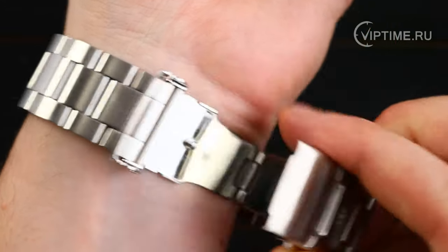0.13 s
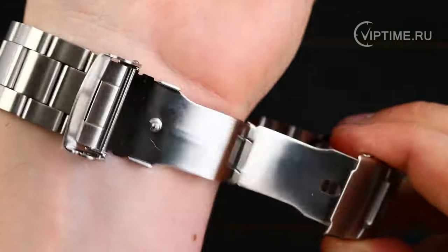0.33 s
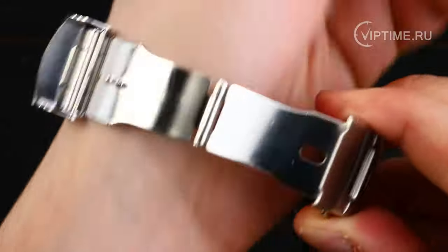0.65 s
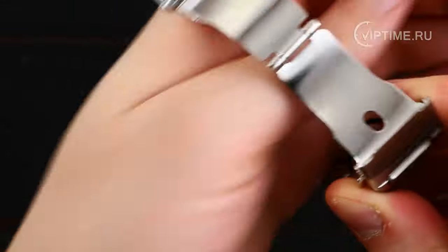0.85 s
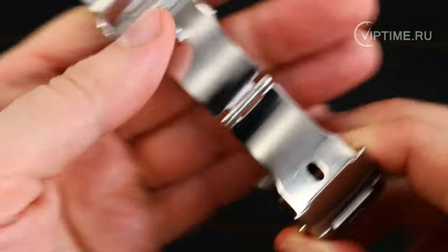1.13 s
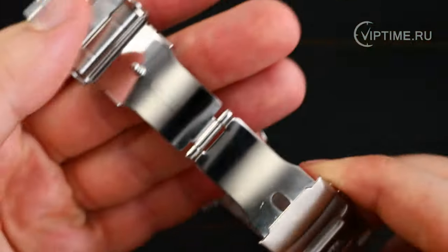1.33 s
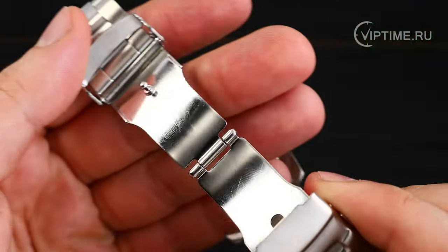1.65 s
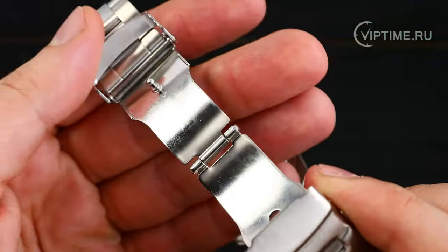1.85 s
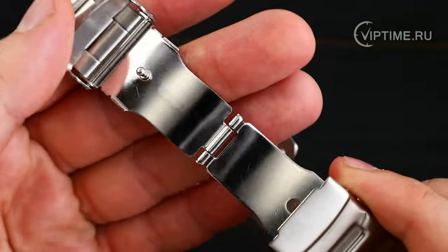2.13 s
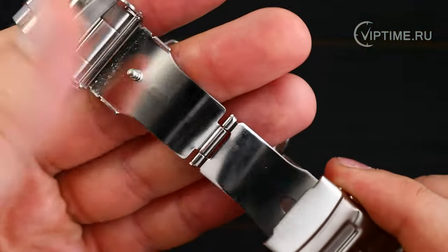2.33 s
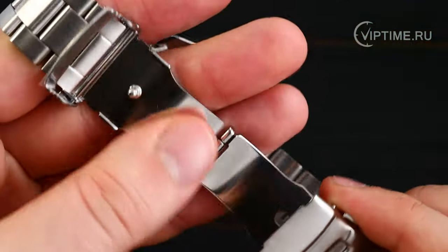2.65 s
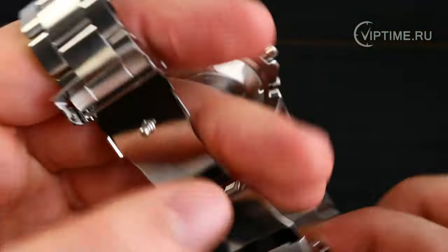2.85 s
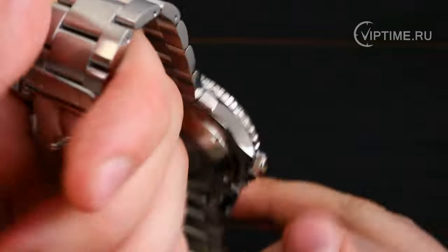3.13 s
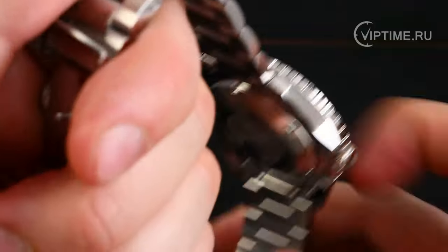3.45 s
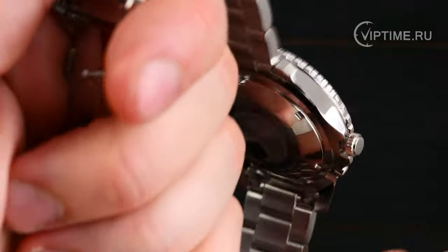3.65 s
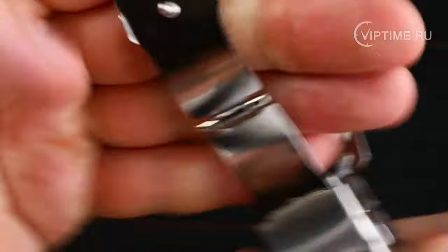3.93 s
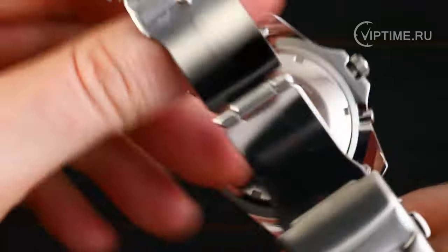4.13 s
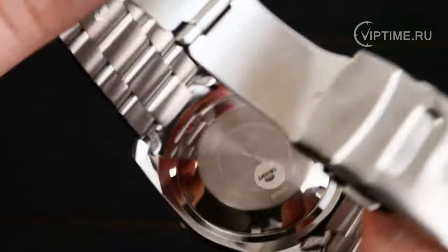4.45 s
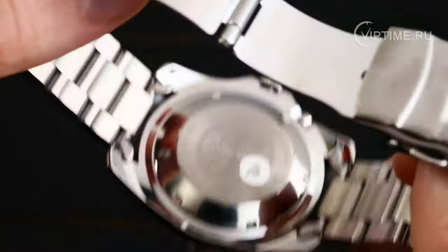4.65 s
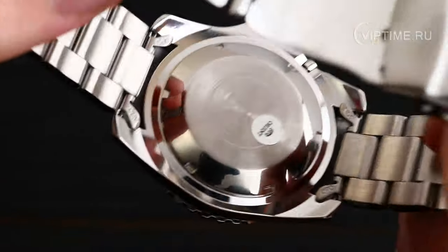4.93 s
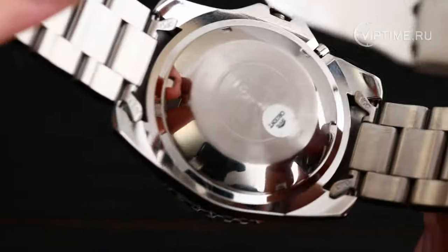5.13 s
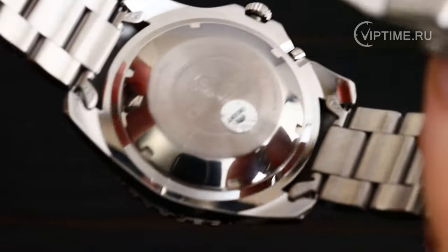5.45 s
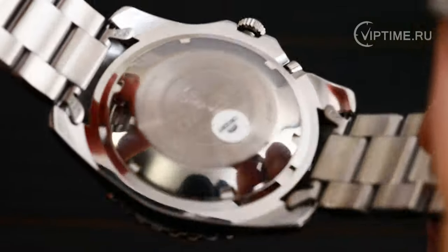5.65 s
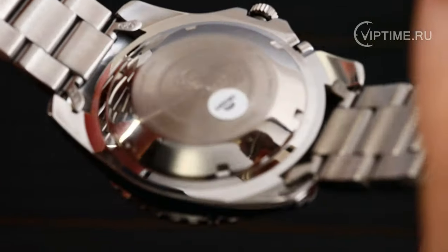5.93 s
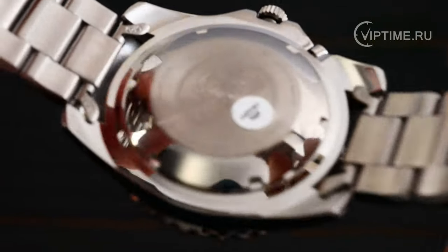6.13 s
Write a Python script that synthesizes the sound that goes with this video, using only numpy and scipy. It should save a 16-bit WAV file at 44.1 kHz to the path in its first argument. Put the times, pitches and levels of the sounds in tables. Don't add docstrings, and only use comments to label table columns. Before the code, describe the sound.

Fingers handle a steel watch bracelet, links and folding clasp giving small bright clicks and ticks over a low steady room hum.

```python
import sys
import numpy as np
from scipy import signal
from scipy.fft import rfft, irfft
from scipy.io import wavfile
from scipy.ndimage import uniform_filter1d

SR = 44100
rng = np.random.default_rng(int(sys.argv[2]) if len(sys.argv) > 2 else 0)


def materialize(psi):
    bounded = np.clip(np.atleast_2d(psi).T, -1, 1)
    quanta = np.round(bounded * 32767).astype(np.int16)
    wavfile.write(sys.argv[1], SR, quanta)


def field_ratio(decibels):
    return 10 ** (np.asarray(decibels, dtype=float) / 20)


N = 277168
KNOCK_SAMPLES = 2048


def in_time(rows):
    s, value = np.transpose(rows)
    return np.interp(np.arange(N) / SR, s, value)


def at_hz(points, hz):
    at, value = np.transpose(points)
    return np.interp(np.log(np.maximum(hz, 1)), np.log(at), value)


def rms_one(x):
    return x / np.sqrt(np.mean(x ** 2) + 1e-20)


def peak_one(x):
    power = uniform_filter1d(np.mean(x, axis=0) ** 2, size=30)
    return x / np.sqrt(2 * power.max())


def above(x, edge_hz):
    return signal.sosfilt(signal.butter(5, edge_hz, "high", fs=SR, output="sos"), x)


def drift(rate_hz):
    steps = rng.standard_normal(400)
    return np.interp(np.arange(N) / SR * rate_hz, np.arange(400), steps)


# frequency in Hz, level in dB rms.
MAINS_TONES = [(100, -61.5), (150, -52), (300, -65), (600, -74.5)]


def hum():
    t = np.arange(N) / SR
    total = 0
    for hz, db in MAINS_TONES:
        level = np.sqrt(2) * field_ratio(db + 0.53 * drift(2.64))
        total = total + level * np.sin(2 * np.pi * (hz * t + rng.random()))
    return total * field_ratio(np.array([[-.4], [.4]]))


# frequency in Hz, correlation from -1 to 1.
SIDE_LIKENESS = [(60, 0.97), (130, 0.95), (290, 0.94), (640, 0.69), (1410, 0.26), (3100, -0.17),
                 (6820, -0.25), (15000, -0.25)]
# frequency in Hz, left over right in dB.
SIDE_LEAN = [(60, -4), (110, 1), (200, -0.5), (380, -0.5), (700, -0.5), (1290, -2.5), (2380, -4.0),
             (4400, -2), (8120, -2.5), (15000, 0.5)]


def diffuse(gain):
    hz = np.fft.rfftfreq(N, 1 / SR)
    mid, side = rfft(rng.standard_normal((2, N)))
    alike = np.clip(at_hz(SIDE_LIKENESS, hz), -1, 1)
    sign = np.array([[1], [-1]])
    pair = np.sqrt(1 + alike) * mid + np.sqrt(1 - alike) * side * sign
    lean = field_ratio(at_hz(SIDE_LEAN, hz) / 2 * sign)
    return rms_one(irfft(pair * gain(hz) * lean, N))


def resonance(hz, centre_hz, width_hz):
    return 1 / (1 + ((hz - centre_hz) / (width_hz / 2)) ** 2)


# frequency in Hz, width in Hz, level in dB rms.
FAN_RESONANCES = [(100.2, 2.2, -77), (110.7, 3.9, -64), (135, 19, -67), (186, 47, -66), (224.1, 3, -63.5),
                  (248, 50, -62.5), (302.8, 21, -64), (320.5, 12, -64.5), (363, 17, -91), (509, 7, -73.5),
                  (897, 25, -70.5), (1183, 130, -68), (6600, 1700, -74)]
# frequency in Hz, level in dB per Hz.
AIR_SPECTRUM = [(25, -46), (60, -7.5), (90, -3), (330, -3), (420, -5.5), (800, -9), (1350, -11),
                (1930, -12), (3500, -20), (5000, -26.5), (9000, -32.5), (15700, -30.5), (15950, -58)]


def fan():
    air_db = -54 - 27.5

    def gain(hz):
        power = field_ratio(air_db + at_hz(AIR_SPECTRUM, hz)) ** 2
        for centre_hz, width_hz, db in FAN_RESONANCES:
            power = power + field_ratio(db) ** 2 / width_hz * resonance(hz, centre_hz, width_hz) ** 2
        return np.sqrt(power)

    total_power = np.sum(gain(np.arange(1, SR // 2)) ** 2)
    return np.sqrt(total_power) * diffuse(gain)


# time in seconds, level in dB.
RUMBLE_LEVEL = [(0.0, -67), (0.23, -83), (1.84, -71), (1.89, -80), (2.34, -73), (2.53, -62), (2.75, -68),
                (2.83, -60.5), (4.69, -73), (6.12, -71), (6.28, -56)]


def rumble():
    t = np.arange(N) / SR
    tone = np.sqrt(2) * np.sin(2 * np.pi * (44.5 * t + 0.29 * drift(4.0)))
    noise = np.mean(diffuse(lambda hz: resonance(hz, 56, 12)), axis=0)
    return field_ratio(in_time(RUMBLE_LEVEL) + 1.0) * (1.16 * tone + 0.37 * noise)


# time in seconds, level in dB.
RUSTLE_LEVEL = [(0.0, -69.5), (0.87, -65.5), (1.07, -62.5), (1.48, -78), (2.2, -89), (2.75, -99),
                (3.01, -73), (3.2, -57), (3.34, -73.5), (3.6, -71.5), (4.02, -58.5), (4.29, -62.5),
                (4.48, -59), (4.65, -61), (5.04, -75.5), (5.84, -73.5), (5.96, -89), (6.28, -72)]
# frequency in Hz, level in dB per Hz.
STEEL_SPECTRUM = [(1760, -39), (3000, -4), (6480, -6.5), (7160, -5), (8440, -8), (13900, -10.5),
                  (15800, -14), (16500, -37)]


def rustle(per_s=12000, count=14):
    t60_s = 0.0021
    sizes = field_ratio(3.2 * np.minimum(rng.exponential(1, N), 5)) * rng.choice([-1, 1], N)
    born = rng.random(N) < per_s / SR
    mode = rng.integers(0, count, N)
    sides = rng.normal(1, 1.0, (2, N))
    radius = field_ratio(-60 / (t60_s * SR))
    out = 0
    for k, hz in enumerate(np.linspace(3800, 15500, count)):
        ticks = sides * sizes * born * (mode == k) + 1e-18
        poles = [1, -2 * radius * np.cos(2 * np.pi * hz / SR), radius * radius]
        out = out + field_ratio(at_hz(STEEL_SPECTRUM, hz)) * signal.lfilter([1, 0, -1], poles, ticks)
    return field_ratio(in_time(RUSTLE_LEVEL) - 3.0 + 6.3 * drift(45)) * rms_one(above(out, 3200))


def ringing(hz, level_db, t60_s, turn_rad, lean_db):
    t = np.arange(KNOCK_SAMPLES) / SR
    modes = field_ratio(level_db) * np.exp(-np.log(1000) * t / t60_s)
    sides = []
    for sign in (1, -1):
        wave = np.sin(2 * np.pi * hz * t + sign * turn_rad)
        sides.append(np.sum(modes * field_ratio(sign * lean_db) * wave, axis=0))
    return np.array(sides)


def chatter(chatter_ms):
    slip = rng.random((3, 300))
    after_s = np.cumsum(-np.log(1 - slip[0]) * .00025)
    age = after_s * 1000 / (0.48 * chatter_ms)
    swell = np.minimum(age + .12, 1)
    force = (swell * np.exp(-.6 * age) + 0.25 * np.exp(-after_s / 0.0078)) * field_ratio(-12 * slip[1])
    force[0] += 2.5 / chatter_ms ** 2
    contacts = np.zeros(KNOCK_SAMPLES)
    at = np.minimum(after_s * SR, KNOCK_SAMPLES - 1).astype(int)
    np.add.at(contacts, at, force * np.sign(slip[2] - .5))
    return contacts


def links(bright_hz, chatter_ms, treble_db, count=60):
    draw = rng.random((5, count, 1))
    hz = 3300 + 13200 * ((np.arange(count)[:, None] + draw[0]) / count) ** 0.93
    near = np.exp(-(np.log2(hz / bright_hz) / .18) ** 2)
    lumps_db = 21 * uniform_filter1d(draw[2], size=4, axis=0)
    tilt_db = treble_db * np.tanh(2 * np.log2(hz / 8800)) / 2
    level_db = at_hz(STEEL_SPECTRUM, hz) + tilt_db + 10 * near + lumps_db
    t60_s = .007 * field_ratio(8 * draw[1] ** 4 + 4 * near) * (hz / 6000) ** -.3
    turn_rad = 3.34 * (draw[3] - .5) * (hz / 8000) ** .5
    rings = ringing(hz, level_db, t60_s, turn_rad, 2.3 * (draw[4] - .5))
    knock = signal.fftconvolve(rings, chatter(chatter_ms)[None], axes=1)[:, :KNOCK_SAMPLES]
    fade = np.hanning(2 * KNOCK_SAMPLES)[KNOCK_SAMPLES:]
    return peak_one(above(knock * fade, 4240))


# frequency in Hz, level in dB, t60 in seconds.
PLATE_MODES = [(995, -4, 0.014), (1727, -7.5, 0.04), (2190, 1, 0.017), (2430, 7, 0.014), (2805, -2, 0.032),
               (3125, 2, 0.019), (4060, -9.5, 0.063), (4420, -1.5, 0.0095), (5000, 10, 0.0057)]


def plate():
    hz, level_db, t60_s = np.transpose(PLATE_MODES)[:, :, None]
    draw = rng.standard_normal((3, len(PLATE_MODES), 1))
    swell = np.minimum(np.arange(KNOCK_SAMPLES) / SR / 0.00021, 1)
    detune = 1 + .006 * draw[0]
    rings = ringing(detune * hz, level_db + 0.41 * draw[1], t60_s, 0.72 * draw[2] - .4, -1.1)
    soft = signal.lfilter(np.hanning(9), 1, rings * swell)
    return peak_one(above(soft, 780))


# start in seconds, peak in dB.
FAINT_TICKS = [(.1026, -55), (.1274, -47.5), (.345, -54.5), (.4057, -49), (.4249, -51), (.4518, -49.5),
               (.655, -50.5), (.6834, -50), (.7566, -54), (.835, -48), (1.082, -48.5), (1.136, -64),
               (1.285, -56), (1.328, -60), (1.403, -48.5), (1.4643, -53), (1.7483, -54), (2.3944, -53),
               (2.4388, -52), (3.0042, -46.5), (3.03, -50), (3.0608, -59), (3.1053, -45), (3.1125, -50),
               (3.1332, -47), (3.1684, -59), (3.191, -43), (3.316, -48), (3.337, -52), (3.3637, -52),
               (3.48, -54), (3.538, -50), (3.5536, -52), (3.6468, -46), (3.823, -53), (3.9273, -46),
                 (3.9813, -53), (4.0196, -47), (4.096, -52), (4.156, -48), (4.2293, -62), (4.2578, -52),
                 (4.4924, -44), (4.5294, -53), (4.5967, -47), (4.617, -51), (4.6605, -51), (4.722, -46),
                 (4.7475, -49), (4.772, -54), (4.8122, -55), (5.2393, -50), (5.336, -49), (5.7385, -50)]


def tick_contacts():
    plate_db, chatter_ms, treble_db = -7, 4.6, 8
    ticks = FAINT_TICKS
    link_hz = rng.uniform(3800, 14000, len(ticks))
    return [(s, db, hz, plate_db, chatter_ms, treble_db) for (s, db), hz in zip(ticks, link_hz)]


# start in seconds, peak in dB, brightest mode in Hz, chatter in ms.
BARE_LINKS = [(.1878, -42, 6600, 2.7), (.382, -42.5, 9520, 3.2), (.5464, -44.5, 9110, 4.9),
              (.5584, -33, 7340, 1.5), (.5677, -40, 7840, 7.7), (.831, -39.5, 10310, 1.3),
              (.85, -39.5, 4090, 18), (.8627, -40, 14500, 19), (.8954, -40.5, 11700, 2),
              (.948, -35.5, 11200, 1.9), (2.4013, -39.5, 7600, 1.8), (2.4285, -38.5, 8000, 2.5),
              (3.1546, -39, 6060, 3.7), (3.6266, -41.5, 13600, 3.4), (3.639, -45, 8530, 18),
              (3.6856, -45, 13600, 14), (3.8583, -43, 5260, 2.6), (3.9137, -41, 4720, 5),
              (3.963, -36.5, 6450, 1.7), (4.035, -25, 7450, 4.8), (4.3201, -42.5, 9200, 11),
              (4.3475, -33.5, 4600, 3.2), (4.3565, -28, 8800, 2.6), (4.385, -31.5, 8200, 2.2),
              (4.5683, -32, 9000, 1.94), (4.59, -38, 7160, 4.8), (4.713, -44, 11100, 6.4),
              (5.346, -41.5, 7300, 8), (5.3634, -32, 10900, 2.8)]
# start in seconds, peak in dB, brightest mode in Hz, chatter in ms.
HELD_LINKS = [(.5834, -49, 7300, 16), (.6127, -45.5, 7350, 2.1), (.697, -49, 4160, 30),
              (.8403, -43, 12000, 3.3), (.884, -48, 13500, 13), (.912, -41, 12800, 6.3),
              (1.009, -45, 14020, 19), (1.2323, -43.5, 14300, 4.1), (3.0922, -36, 12800, 2.3),
              (3.1418, -39, 5930, 2.5), (3.2187, -43, 4160, 3.8), (3.2303, -41.5, 9800, 6.3),
              (3.677, -38.5, 6900, 3.3), (3.9016, -38, 6060, 3.2), (4.0634, -46, 8960, 8.8),
              (4.1763, -33, 5150, 2.1), (4.2461, -44.5, 6100, 5.4), (4.2955, -42.5, 5040, 18),
              (4.395, -36, 12800, 3.7), (4.406, -36, 11000, 3.8), (4.452, -37, 13420, 1.9),
              (4.458, -39, 3470, 17), (4.4863, -37.5, 10720, 4.7), (4.501, -33, 11100, 3.5),
              (4.5435, -31, 13200, 3.7), (4.6917, -45.5, 11000, 8.5), (4.7952, -43, 12300, 3.8),
              (5.7708, -42, 13600, 1.9)]


def link_contacts():
    plate_share_db, plate_most_db = -13.5, -45.5
    rows = []
    for table, treble_db in ((BARE_LINKS, 17.5), (HELD_LINKS, 6)):
        for s, db, hz, chatter_ms in table:
            plate_db = min(plate_share_db, plate_most_db - db)
            rows.append((s, db, hz, plate_db, chatter_ms, treble_db))
    return rows


# start in
# seconds, peak in dB, brightest mode in Hz, plate in dB, treble in dB.
CLASP_KNOCKS = [(.2005, -53, 4200, 3, 1), (0.2611, -53.5, 5760, 9.5, -14), (0.9202, -30, 14300, -11, 22),
                (0.9735, -32.5, 6250, -1.5, 5), (0.998, -40, 4480, -5, 6), (1.037, -25.5, 3700, -4.5, -20),
                (1.0559, -38, 6070, -2, 12), (1.4798, -28.5, 11400, -1.5, -8.5),
                (2.75, -33.5, 7450, -8.5, 8), (2.972, -41.5, 7000, -11, -2), (3.1988, -40, 4360, -5, -18),
                (3.3487, -26, 11400, -4.5, -9), (3.891, -35, 5600, -10, -13), (4.1132, -44, 4970, 1.5, -2),
                (4.1304, -19.5, 7150, -45, -12), (4.335, -34.5, 5430, -6, 11), (4.742, -53, 3300, 5, -10),
                (4.8348, -25.5, 10800, -3.5, -5), (5.9346, -55, 4300, 6.5, -1)]


def clasp_contacts():
    chatter_ms = 1.54
    return [(s, db, hz, plate_db, chatter_ms, treble_db) for s, db, hz, plate_db, treble_db in CLASP_KNOCKS]


# start in seconds, peak in dB, frequency in Hz, t60 in seconds.
PING_MODES = [(0.557, -36, 7400, .012), (.852, -51, 4170, 0.033), (.884, -50, 4020, 0.035),
              (0.92, -39, 4280, 0.028), (1.0378, -37, 3440, 0.029), (1.038, -39, 5000, 0.023),
              (2.401, -41, 7640, 0.012), (2.427, -34, 7200, 0.021), (3.218, -41, 4000, 0.025),
              (3.232, -57, 9300, .035), (3.8583, -34, 5090, 0.022), (4.036, -42, 5330, 0.062),
              (4.1291, -32, 5900, 0.0089), (4.1327, -30, 4570, 0.012), (4.176, -31.5, 5320, 0.015),
              (4.178, -38, 9200, 0.032), (4.458, -45, 3500, 0.023), (4.749, -56, 4670, 0.096),
              (4.835, -37, 5400, 0.011)]


def ping(peak_db, hz, t60_s):
    pair_hz = hz * np.array([[1], [1.03]])
    pair_db = peak_db - np.array([[2], [9]])
    return above(ringing(pair_hz, pair_db, t60_s, rng.normal(0, 0.43, (2, 1)), 0), 2300)


def knocks():
    out = np.zeros((2, N + KNOCK_SAMPLES))
    contacts = clasp_contacts() + link_contacts() + tick_contacts()
    for s, peak_db, bright_hz, plate_db, chatter_ms, treble_db in contacts:
        knock = links(bright_hz, max(chatter_ms, .3), treble_db) + field_ratio(plate_db - 2.5) * plate()
        at = round(s * SR)
        out[:, at:at + KNOCK_SAMPLES] += knock * field_ratio(peak_db)
    for s, peak_db, hz, t60_s in PING_MODES:
        at = round(s * SR)
        out[:, at:at + KNOCK_SAMPLES] += ping(peak_db, hz, t60_s)
    return out[:, :N] * field_ratio(np.array([[-.6], [.6]]))


def room(x, t60_s=0.54, wet_db=-25):
    t = np.arange(SR // 4) / SR
    decay = np.exp(-np.log(1000) * t / t60_s) * (t > .003)
    tail = rms_one(rng.standard_normal((2, len(t)))) * decay
    tail = tail / np.sqrt(np.sum(tail[0] ** 2))
    return x + field_ratio(wet_db) * signal.fftconvolve(x, tail, axes=1)[:, :N]


def scene():
    rubbing = rustle() + field_ratio(-5.5) * rustle(per_s=600)
    return hum() + fan() + rumble() + room(knocks() + rubbing)


def low_pass(x):
    return signal.sosfilt(signal.butter(12, 17000, fs=SR, output="sos"), x)


def record(dry):
    cut = signal.sosfilt(signal.cheby1(12, 1, 15850, fs=SR, output="sos"), dry)
    return low_pass(cut)


dry = scene()
out = record(dry)
materialize(out)
```